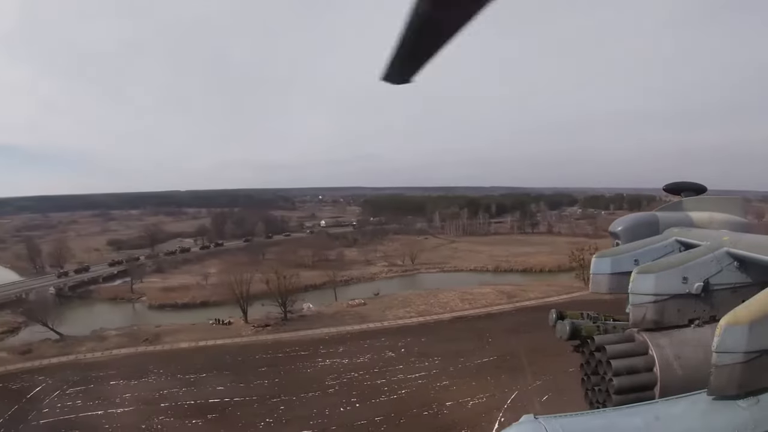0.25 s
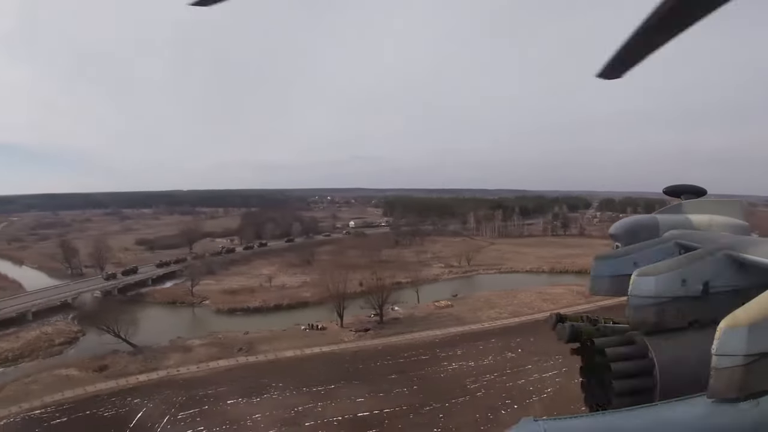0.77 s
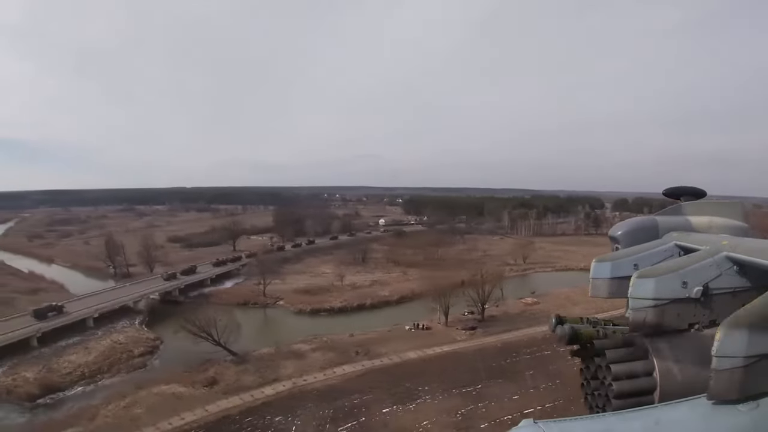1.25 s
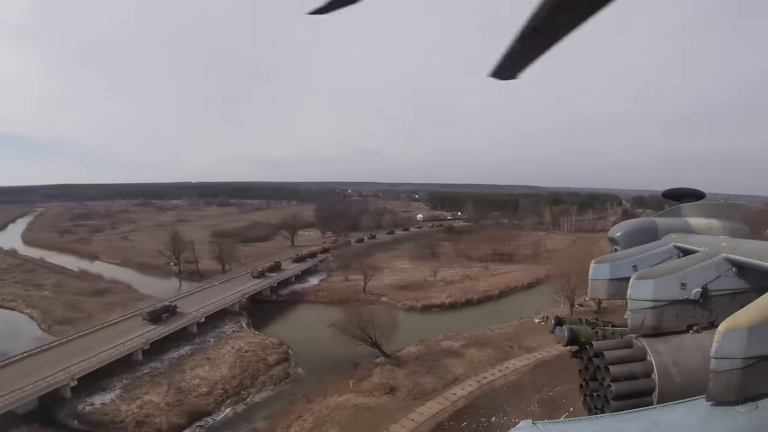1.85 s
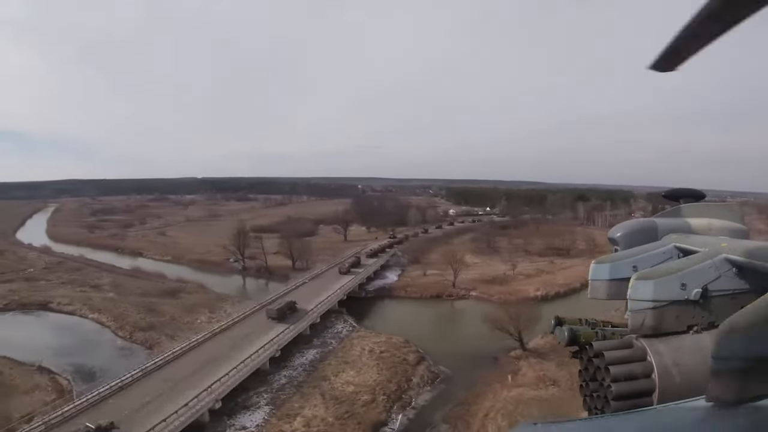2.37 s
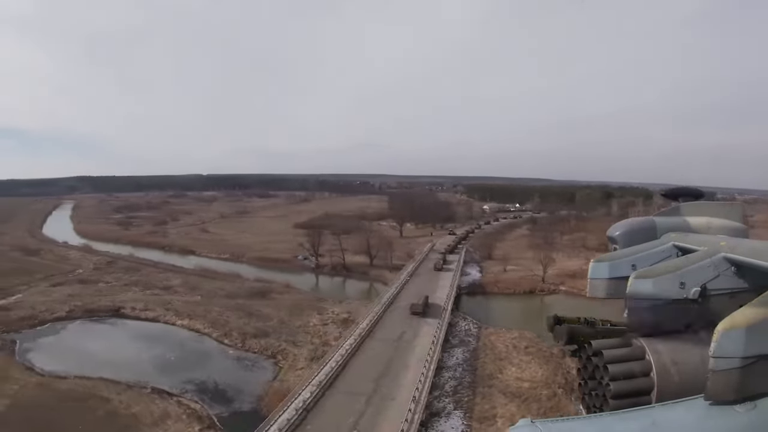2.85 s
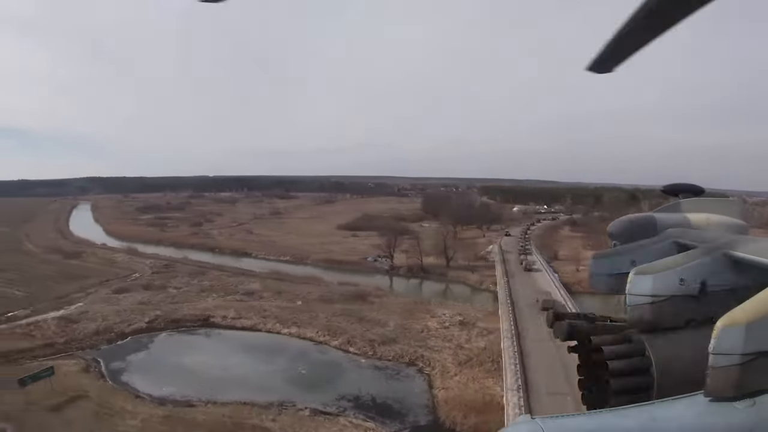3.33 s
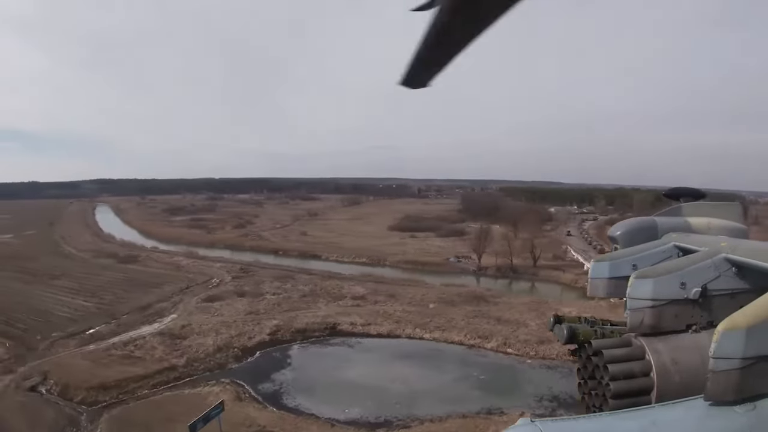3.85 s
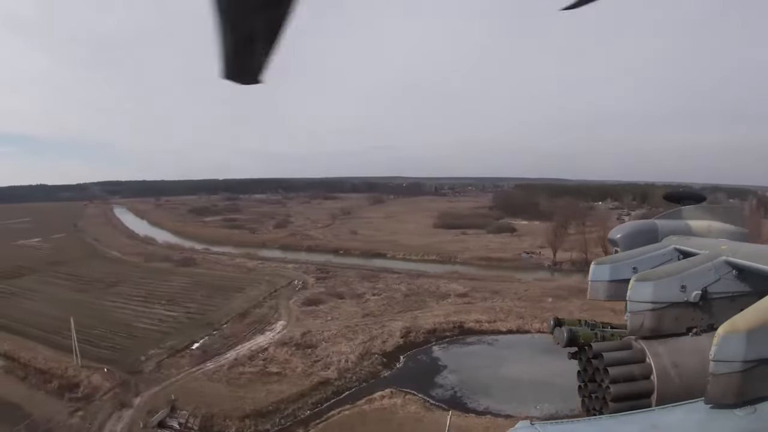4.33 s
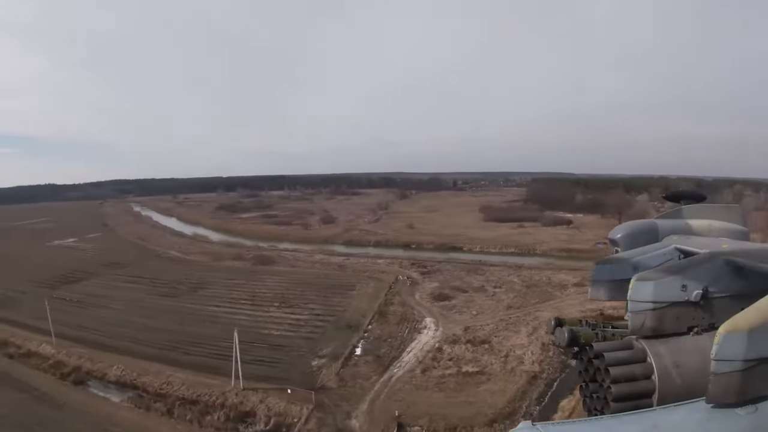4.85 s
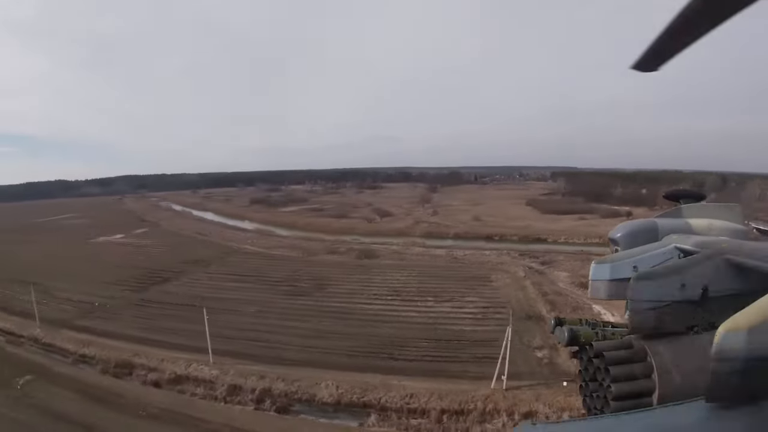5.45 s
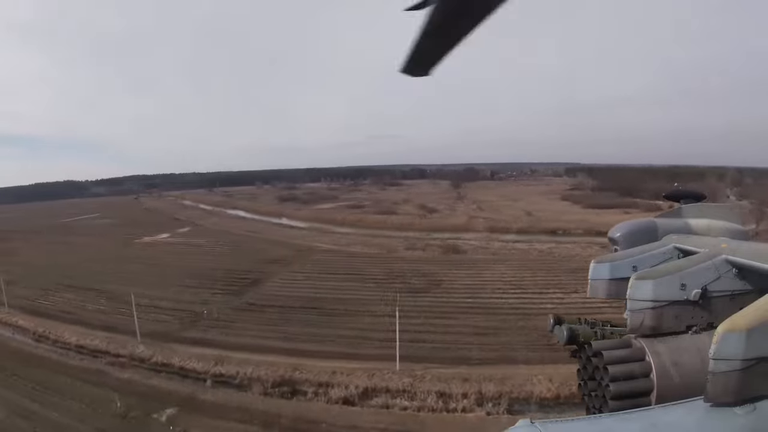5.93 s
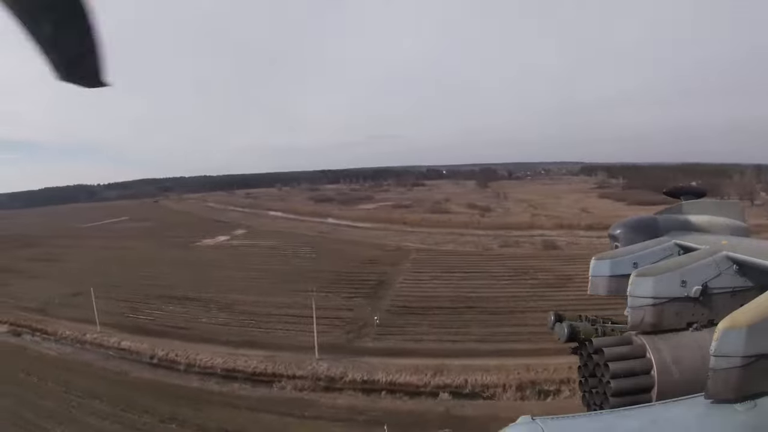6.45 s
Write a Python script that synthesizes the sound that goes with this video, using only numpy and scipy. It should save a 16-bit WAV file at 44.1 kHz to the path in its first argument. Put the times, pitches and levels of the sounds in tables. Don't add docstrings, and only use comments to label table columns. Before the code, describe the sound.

A flying helicopter's dense, muffled roar, with bass buffet, a constant mid-low hum and thin whines, opens with quick slaps and cuts off abruptly.

```python
import sys
import numpy as np
from scipy import signal
from scipy.fft import rfft, irfft
from scipy.io import wavfile
from scipy.ndimage import uniform_filter1d

SR = 44100
rng = np.random.default_rng(int(sys.argv[2]) if len(sys.argv) > 2 else 0)


def generate_wav(sig):
    pcm = np.round(np.clip(np.atleast_2d(sig).T, -1, 1) * 32767).astype(np.int16)
    wavfile.write(sys.argv[1], SR, pcm)


def gain_from_decibels(decibels):
    exponent = np.asarray(decibels, float) / 20
    return 10 ** exponent


N = 295181

BLADES = 3
MESH_PER_TURN = 70.95
WAKE_S = 0.9
END_S = 6.649

# start_s, whistle_hz
COMPRESSOR = [
    (0, 11030),
    (.8, 11050),
    (2, 11000),
    (2.8, 10920),
    (3.4, 10830),
    (4.1, 10930),
    (4.8, 11040),
    (5.8, 11060),
    (6.64, 10970),
]


def evened(x):
    return x / np.sqrt(np.mean(x ** 2) + 1e-20)


def curves(table, t):
    s, *columns = np.transpose(table)
    return [np.interp(t, s, c) for c in columns]


def drift(hz):
    f = np.fft.rfftfreq(N, 1 / SR)
    return evened(irfft(rfft(rng.standard_normal(N)) / (1 + (f / hz) ** 2) ** 2, N))


def resonate(x, hz, width):
    turn = np.exp(2j * np.pi * np.cumsum(hz * np.ones(len(x))) / SR)
    r = np.exp(-np.pi * width / SR)
    return 2 * (turn * signal.lfilter([1 - r], [1, -r], x / turn)).real


def ringing_noise(hz, width):
    return evened(resonate(resonate(rng.standard_normal(N), hz, width), hz, width))


def split(x, hz):
    low = signal.sosfiltfilt(signal.butter(3, hz, fs=SR, output="sos"), x)
    return low, x - low


def noise(spectrum, size, patchy_db):
    frames, hz = 4 * N // size + 5, np.fft.rfftfreq(size, 1 / SR)
    a, b, patches = rng.standard_normal((frames, len(hz), 3)).T
    patches = uniform_filter1d(patches, size=size // 64, axis=0)
    patches = evened(uniform_filter1d(patches, size=12288 // size, axis=1))
    f, db = np.transpose(spectrum)
    colour_db = np.interp(np.log(hz + 1), np.log(f), db)[:, None]
    grains = (a + 1j * b) * gain_from_decibels(colour_db + patchy_db * patches)
    return signal.istft(grains, nperseg=size, noverlap=3 * size // 4)[1][:N]


def tone(turns, db, waver, sway_db, scatter=1):
    phase = 2 * np.pi * (turns + scatter * rng.random()) + waver * drift(2.2)
    return np.sqrt(2) * gain_from_decibels(db + sway_db * drift(1.0)) * np.sin(phase)


def turbine(t, turns):
    whistle_db, mirror_db, mirror_hz = -89.8, -100.5, 24000
    hz, = curves(COMPRESSOR, t)
    whistle = ringing_noise(hz, 110)
    mirror = ringing_noise(mirror_hz - hz, 110)
    skirt = ringing_noise(hz + 300, 1800)
    chop_db = .5 * np.cos(2 * np.pi * BLADES * turns - .4) + 1.6 * drift(12.0)
    return (gain_from_decibels(whistle_db) * (whistle + skirt) + gain_from_decibels(mirror_db) * mirror) * gain_from_decibels(chop_db)


def hiss(t, blade, chop_db, gust_db):
    # pitch_hz, level_db (per Hz)
    hiss_colour = [(300, -27), (700, -4.5), (1000, 0), (1500, -0.5), (1600, -4), (2500, -5.5),
                   (4000, -14.5), (5000, -13.5), (5800, -20), (6500, -33.5), (8000, -44.5), (10500, -41),
                   (13150, -45.5), (13600, -57)]
    hiss_db = -57.5 + 2.5 * np.exp(-t / WAKE_S)
    wash = noise(hiss_colour, size=512, patchy_db=-0.4)
    band = signal.sosfilt(signal.butter(4, [2100, 6000], "band", fs=SR, output="sos"), wash)
    wash = wash / np.std(band) * gain_from_decibels(hiss_db + chop_db + gust_db)
    body, tips = split(wash, 6800)
    lower_tips, upper_tips = split(tips, 11400)
    flutter_db = 1.6 * drift(60.0) - chop_db
    tip_chop = np.cos(blade - .2)
    return body + lower_tips * gain_from_decibels(1.3 * tip_chop + flutter_db) + upper_tips * gain_from_decibels(2.6 * tip_chop + flutter_db)


def airflow(t, turns):
    # pitch_hz, level_db (per Hz)
    buffet_colour = [(10, -21), (22, -20.5), (40, -17.5), (60, -5.5), (85, -1), (110, -5.5), (138, -2.5),
                     (180, -12.5), (235, -12), (262, -21), (340, -10.5), (400, -16.5), (500, -38),
                     (4000, -130)]
    # pitch_hz, level_db (per Hz)
    roar_colour = [(100, -60.5), (330, -23.5), (400, 0.5), (600, -7), (640, -8.5), (850, -13.5),
                   (1000, -29), (2000, -40.5), (8000, -110)]
    # middle_s, half_length_s, change_db
    wafts = [
        (0.904, .25, 0.5),
        (1.65, .15, 0.9),
        (3.099, 0.18, 1.04),
        (3.695, .35, 1.2),
        (5.298, .3, .4),
        (6.201, 0.18, .5),
    ]
    blade = 2 * np.pi * BLADES * turns
    chop_db = .55 * np.cos(blade - 3.8) + .3 * np.cos(2 * blade - 5.6) + .25 * np.cos(blade / BLADES - 3.7)
    gust_db = 0.38 * drift(1.4) + 0.16 * drift(40.0)
    downwash = hiss(t, blade, chop_db, gust_db)
    waft_db = sum(db * np.exp(-((t - s) / half) ** 2) for s, half, db in wafts)
    buffet = evened(noise(buffet_colour, size=4096, patchy_db=0.0)) * gain_from_decibels(-33.5 + .3 * gust_db)
    roar_db = -46 + waft_db + 1.7 * gust_db + np.cos(blade - 4.4)
    roar = evened(noise(roar_colour, size=1024, patchy_db=1.0)) * gain_from_decibels(roar_db)
    pipe_hz = 470 + 105 * waft_db
    moan = ringing_noise(pipe_hz, 60) * gain_from_decibels(-59 + 8.5 * waft_db)
    return downwash + roar + buffet + moan


def slaps(t):
    # start_s, peak_db, brightness_db (per ring), fall_s
    slap_events = [
        (.0553, -43.5, 0, .008),
        (.1205, -45, -2, .009),
        (.1875, -47, 1, .005),
        (.2592, -40, 2.5, .003),
        (.262, -52, 1, .008),
        (.3244, -56, -2, .008),
        (.379, -50, 2, .008),
        (.386, -49.5, -7, .012),
        (.4445, -45.5, -2, .006),
    ]
    # pitch_hz, width_hz
    slap_rings = [
        (1450, 1000),
        (2200, 1000),
        (4500, 1800),
    ]
    colour_db = 0, -1, -7
    whisper_db = -59.5
    rise_share, leak_db = .44, -30
    puff = rng.standard_normal(N)
    rings = [evened(resonate(resonate(puff, hz, width), hz, width)) for hz, width in slap_rings]
    out = np.exp(-t / WAKE_S) * sum(gain_from_decibels(whisper_db + c) * ring for c, ring in zip(colour_db, rings))
    leak = np.zeros(N)
    for s, db, bright_db, fall_s in slap_events:
        age = np.maximum(t - s, 0)
        burst = (1 - np.exp(-age / (rise_share * fall_s))) * np.exp(-age / fall_s)
        leak += burst * gain_from_decibels(db + bright_db + leak_db)
        for k, (c, ring) in enumerate(zip(colour_db, rings)):
            out += burst * gain_from_decibels(db + c + (k - 1) * bright_db + 7) * ring
    top = evened(signal.sosfilt(signal.butter(6, [6500, 13300], "band", fs=SR, output="sos"), puff))
    return leak * top + signal.sosfilt(signal.butter(7, 5800, fs=SR, output="sos"), out)


def casing(hz, peak_hz, peak_db, width_hz, deepest_db):
    return peak_db - np.minimum(6 * ((hz - peak_hz) / width_hz) ** 2, deepest_db)


def gearbox(t, mesh, mesh_hz):
    # start_s, hum_db
    mesh_load = [
        (0, -35),
        (.6, -33.5),
        (1.5, -32.5),
        (2.9, -33),
        (3.6, -33.5),
        (4.55, -37),
        (5.2, -34),
        (5.8, -33),
        (6.7, -35),
    ]
    # start_s, length_s, change_db
    contact = [(-.1, .76, -5), (.66, .2, 2), (1.03, .17, -2), (1.2, .3, 1), (1.5, 1.8, 2.8), (3.1, .2, 3),
               (3.3, .17, 2.5), (4.6, .83, -1.5), (5.43, .13, 2), (5.57, .13, -5), (5.7, .4, -.5),
               (6.2, .35, 3), (6.55, .2, -2)]
    # start_s, length_s
    backlash = [
        (.1, .3),
        (1.25, 1.1),
        (4.6, .35),
        (5.8, .5),
    ]
    # multiple of the main mesh, level_db
    gear_tones = [(.8891, -53), (1.0425, -57), (1.3507, -55.5), (2.4096, -68), (2.663, -72), (2.887, -72),
                  (3.0, -72), (3.4209, -74), (5.4388, -73), (6.2398, -76), (6.4517, -74)]
    upper_ratio, middle_ratio, idler_ratio = 5.425, 3.241, .9619

    mesh_db, = curves(mesh_load, t)
    hum = tone(mesh, mesh_db, waver=0.031, sway_db=0.57)
    idler_db = -50 - 1.1 * (mesh_hz - 367.3)
    idler = tone(idler_ratio * mesh, idler_db, waver=.4, sway_db=4.0)

    contact_db = sum(db * ((t > s) & (t < s + length)) for s, length, db in contact)
    upper_db = casing(upper_ratio * mesh_hz, 2001, -59.7, 11, 8.5) + uniform_filter1d(contact_db, size=2000)
    upper = tone(upper_ratio * mesh, upper_db + .3 + .5 * drift(40.0), waver=.4, sway_db=0)

    power_db = .022 * (curves(COMPRESSOR, t)[0] - 11040)
    middle_db = casing(middle_ratio * mesh_hz, 1184.5, -59.5, 12, 4.5) + power_db
    middle_turns = middle_ratio * mesh + .05 * drift(15.0)
    middle = tone(middle_turns, middle_db - 1 + 2.6 * drift(12.0), waver=.5, sway_db=0)

    loose = uniform_filter1d(sum(1. * ((t > s) & (t < s + length)) for s, length in backlash), size=6000)
    octave = tone(2 * mesh, -66 + 8.5 * loose, waver=.5, sway_db=1.2)
    others = sum(tone(ratio * mesh, db - 2.5, waver=1.0, sway_db=1.5) for ratio, db in gear_tones)
    return hum + octave + idler + upper + middle + others


def rotor(turns):
    # multiple of the rotor speed, level_db
    shaft_tones = [
        (19.915, -38.5),
        (39.83, -53.5),
    ]
    # multiple of the rotor speed, level_db
    thump_orders = [(3, -48), (5, -62), (6, -46.5), (8, -52), (9, -45), (11, -53), (12, -41), (14, -53),
                    (15, -41.5), (16, -46), (17.08, -45), (18, -41), (21, -46.5), (23, -53), (24, -45),
                    (26, -51), (27, -48), (29, -59), (30, -53), (33, -57), (36, -51), (39.12, -57),
                    (42, -63), (45, -58), (48, -59), (60, -58)]
    smear = .055, -.21, .315, .39
    shaft = sum(tone(order * turns, db, waver=0.65, sway_db=2.0) for order, db in shaft_tones)
    thumps = np.zeros(N)
    for order, db in thump_orders:
        lagged = order * turns + np.polyval(smear, order / BLADES)
        thumps += tone(lagged, db, waver=min(0.022 * order, .7), sway_db=0.076 * order, scatter=order % BLADES)
    return shaft + gain_from_decibels(0.5) * thumps


def scene():
    # start_s, main_mesh_hz
    drive_train = [(0, 365.3), (.3, 365.5), (.65, 366.9), (1.5, 368.4), (2.7, 370), (3.05, 369.4),
                   (3.6, 365), (3.9, 363.6), (4.2, 363.5), (4.5, 364.8), (5.7, 368.4), (6, 369),
                   (6.6, 368.5)]
    t = np.arange(N) / SR
    mesh_hz = uniform_filter1d(curves(drive_train, t)[0], size=8000)
    mesh = np.cumsum(mesh_hz) / SR
    turns = mesh / MESH_PER_TURN
    air = turbine(t, turns) + slaps(t) + airflow(t, turns)
    return (air + gearbox(t, mesh, mesh_hz) + rotor(turns))[None]


def low_pass(x):
    return signal.sosfilt(signal.butter(12, 15900, fs=SR, output="sos"), x)


def record(dry):
    power_db = 10 * np.log10(abs(uniform_filter1d(dry ** 2, size=500)) + 1e-12)
    held = dry / gain_from_decibels(0.28 * np.maximum(power_db + 26, 0))
    bass, rest = split(held, 900)
    held = 0.16 * np.tanh(bass / .16) + 0.86 * rest
    t, end = np.arange(N) / SR, round(END_S * SR)
    for at, level in (0, .03), (end, -.04):
        held = held + (level - held[:, [at]]) * np.exp(-((t - at / SR) / .002) ** 2)
    return low_pass(held * (t < END_S))


dry = scene()
out = record(dry)
generate_wav(out)
```